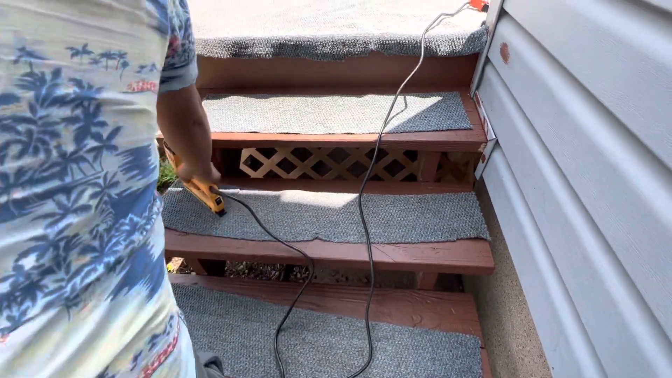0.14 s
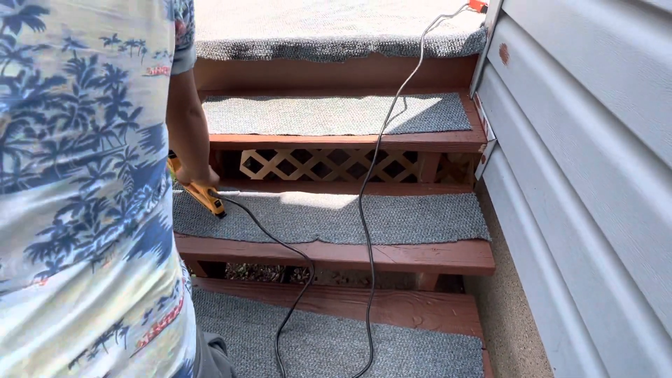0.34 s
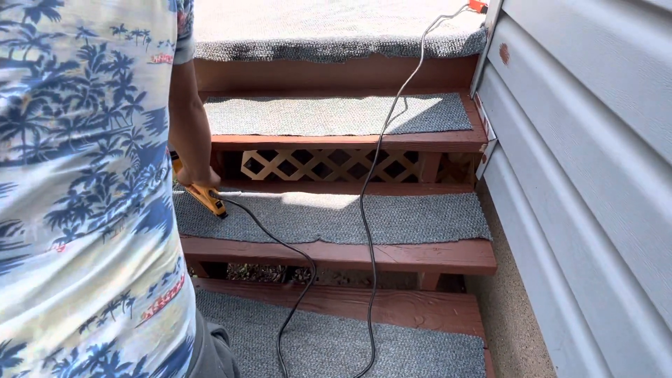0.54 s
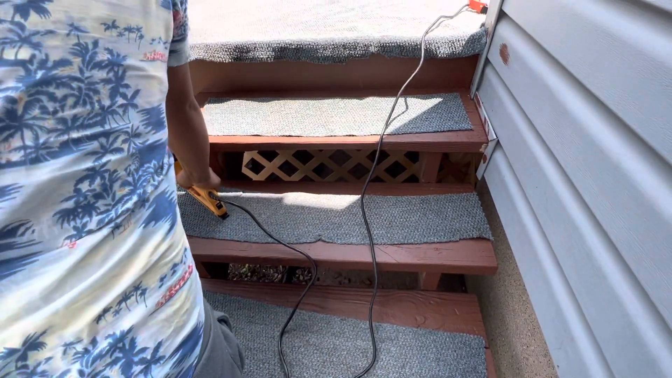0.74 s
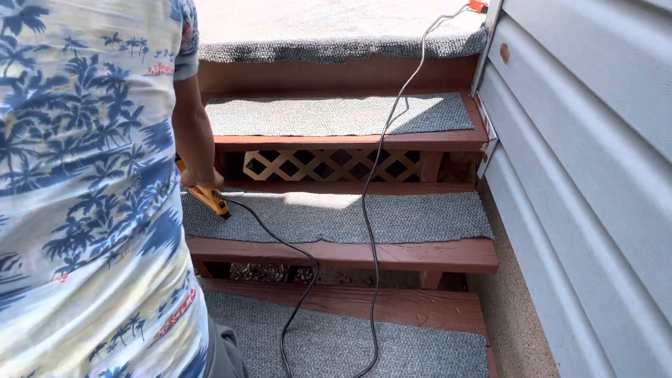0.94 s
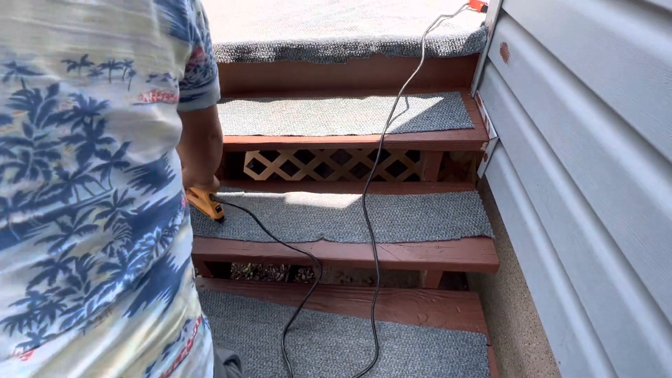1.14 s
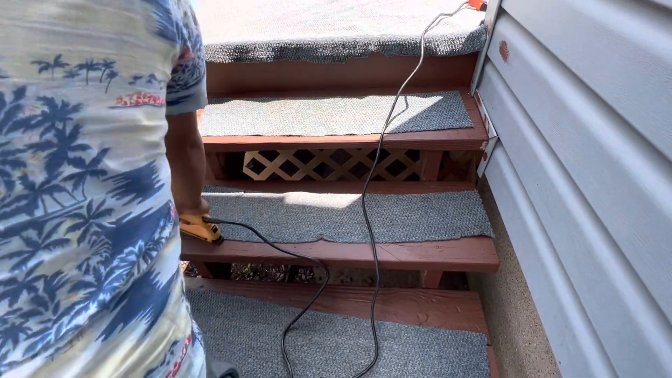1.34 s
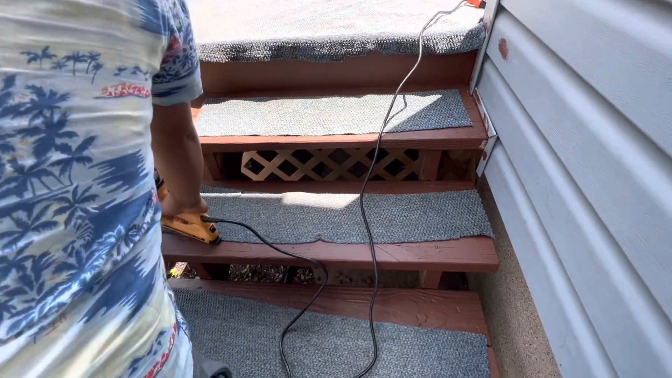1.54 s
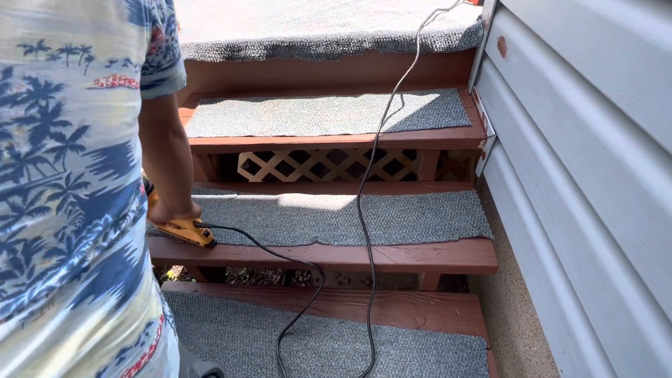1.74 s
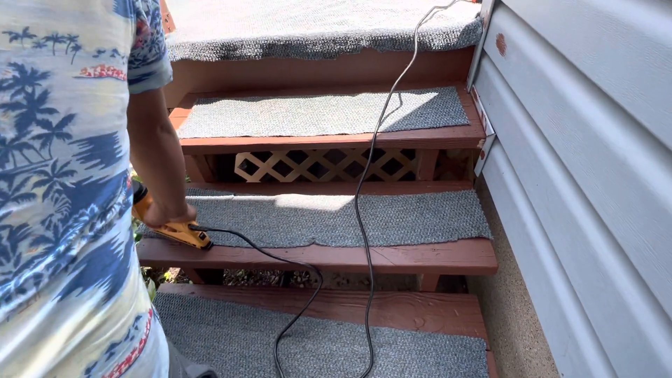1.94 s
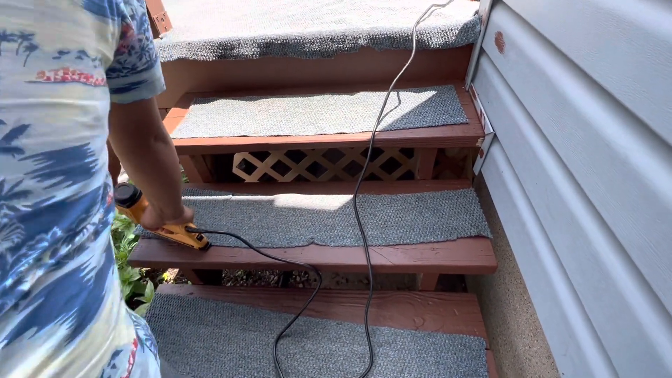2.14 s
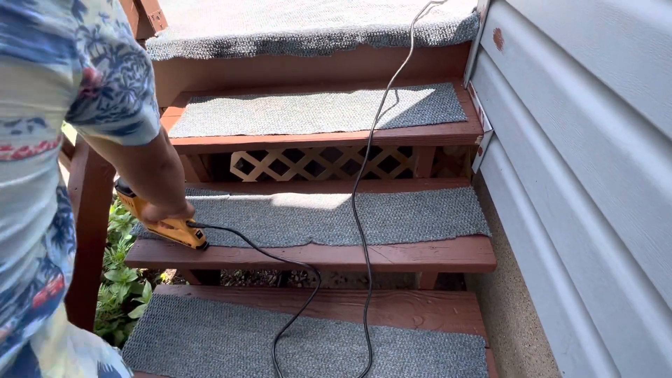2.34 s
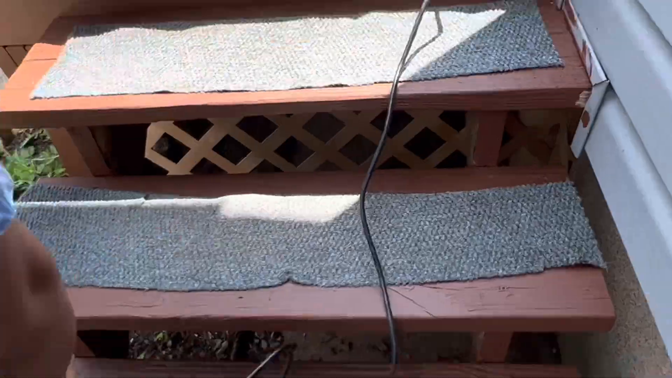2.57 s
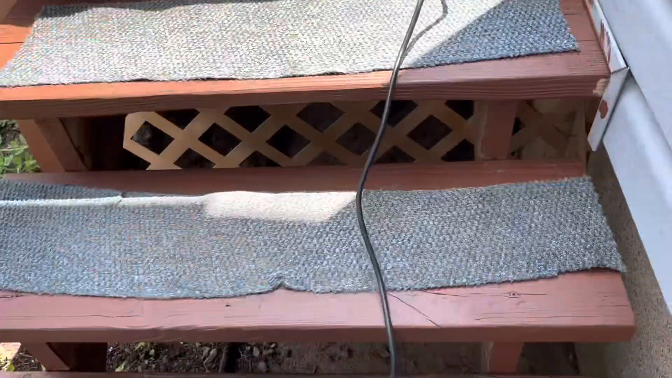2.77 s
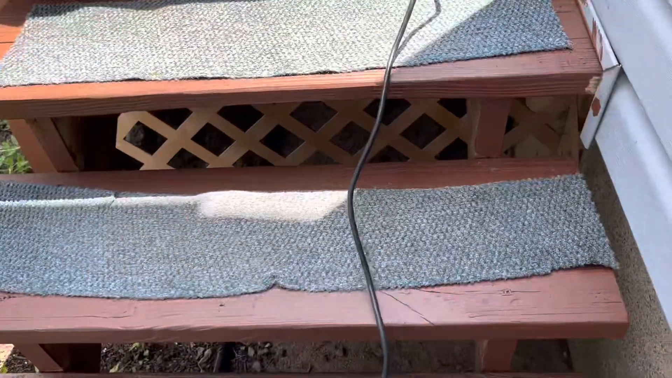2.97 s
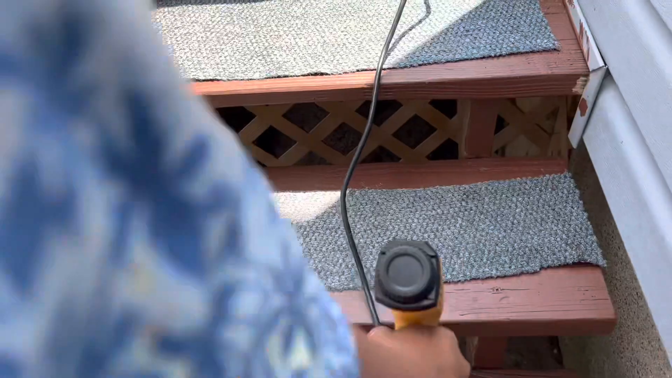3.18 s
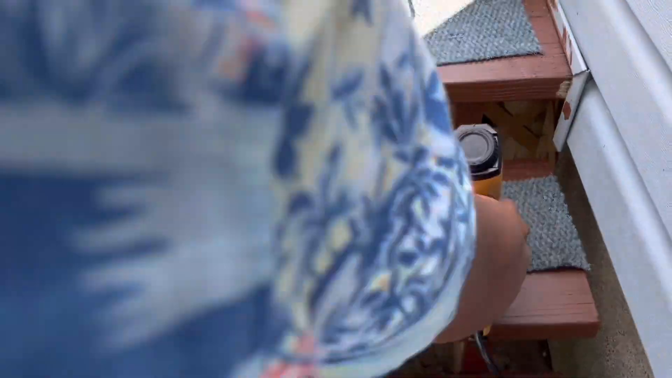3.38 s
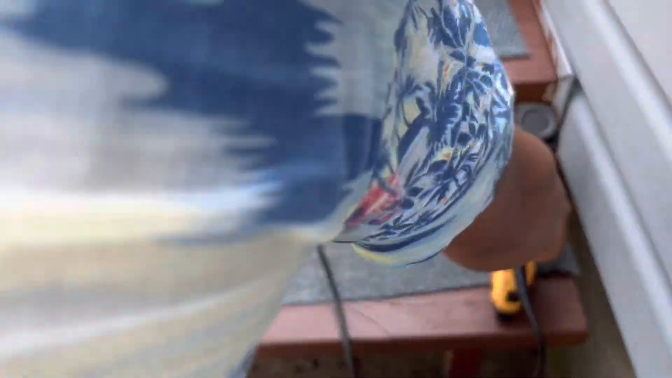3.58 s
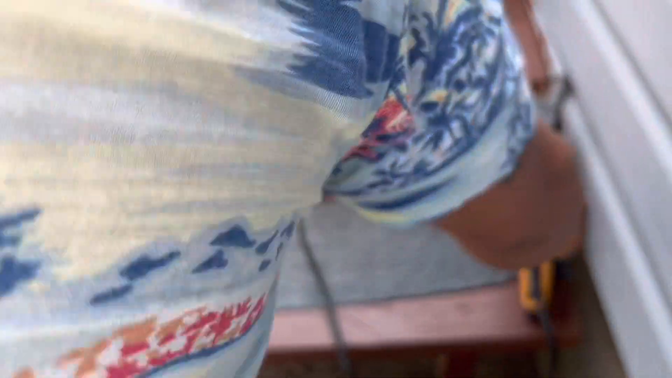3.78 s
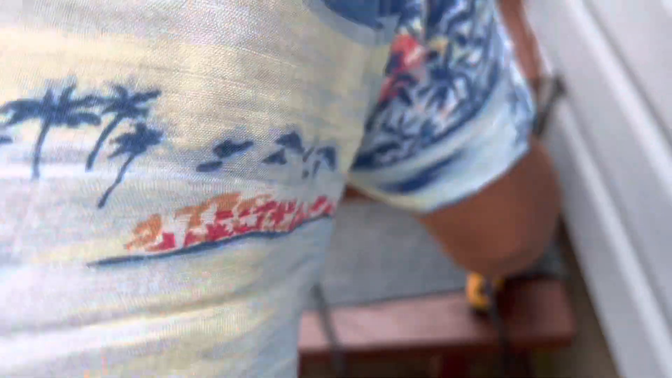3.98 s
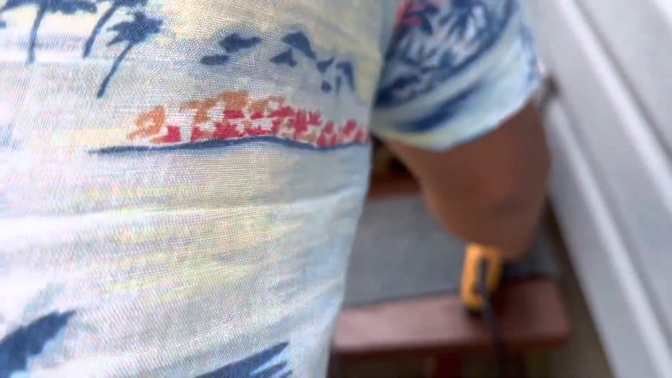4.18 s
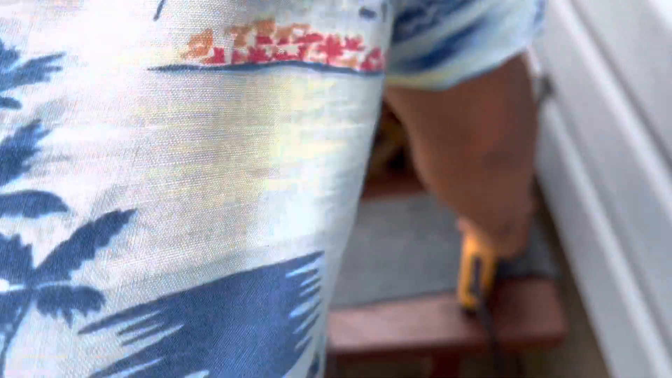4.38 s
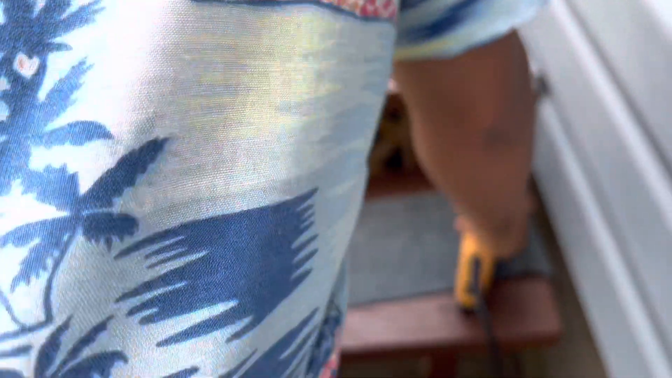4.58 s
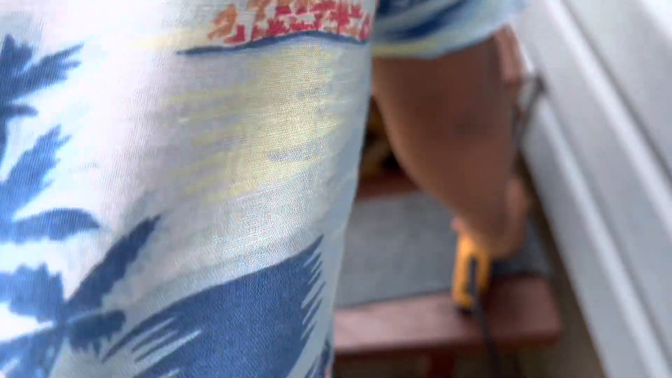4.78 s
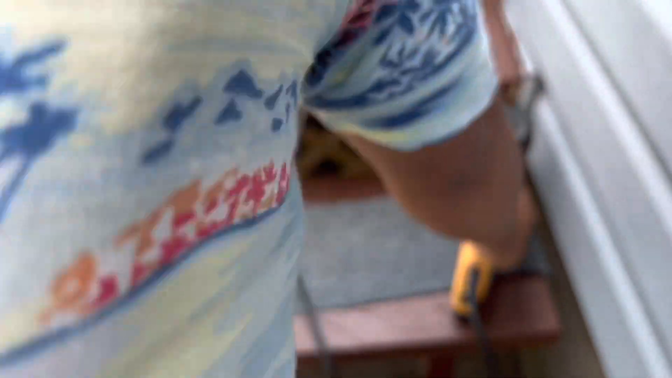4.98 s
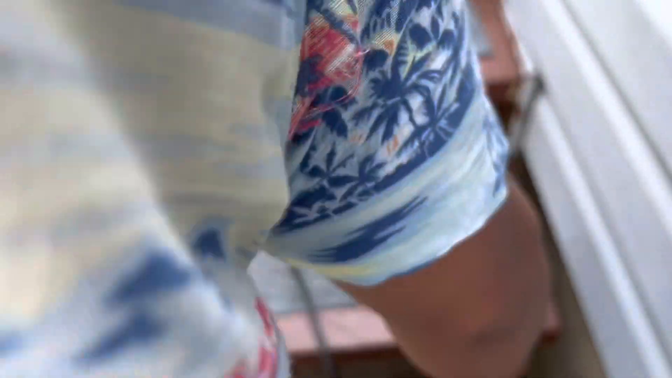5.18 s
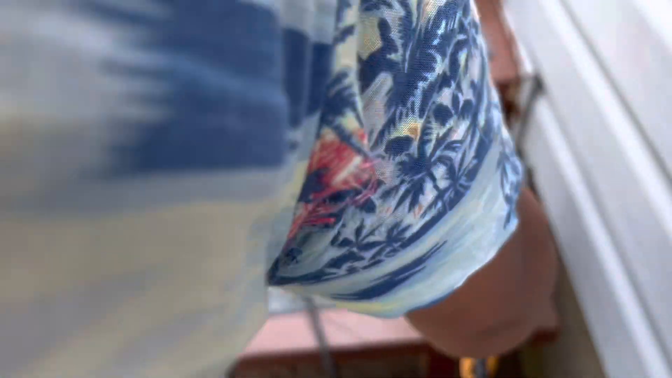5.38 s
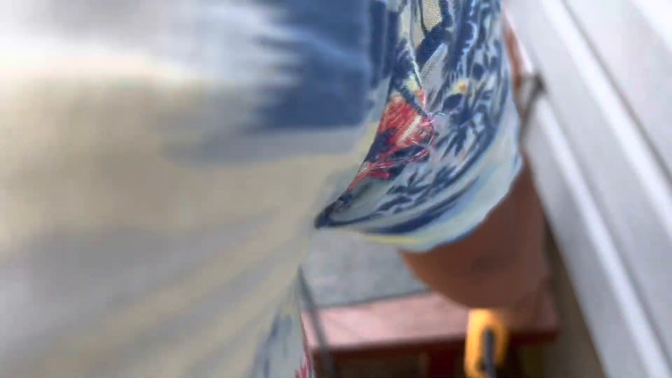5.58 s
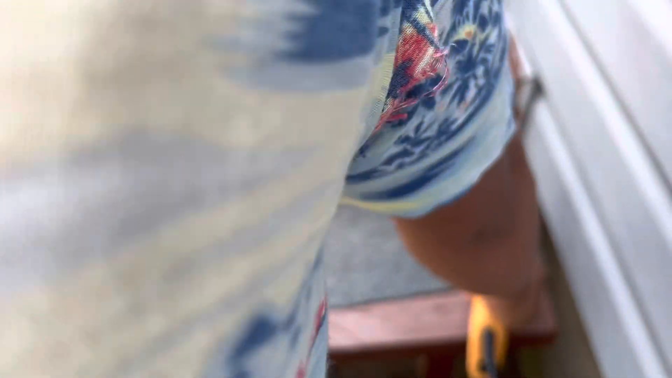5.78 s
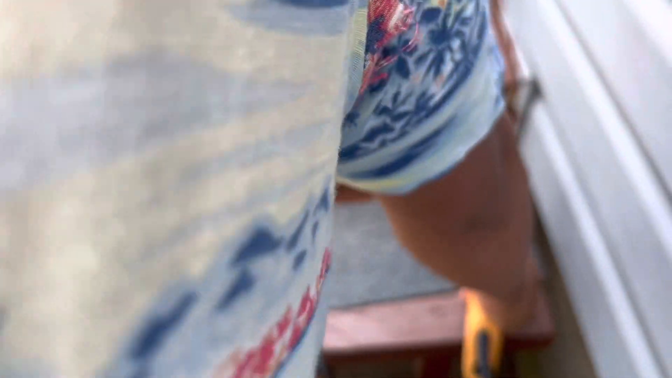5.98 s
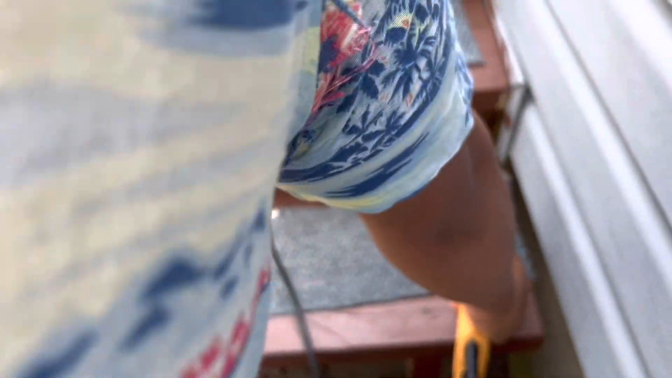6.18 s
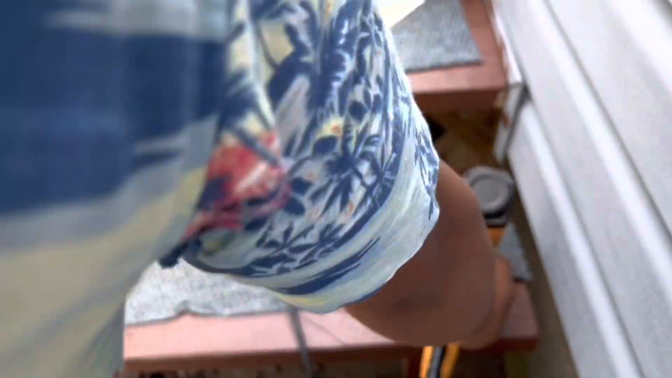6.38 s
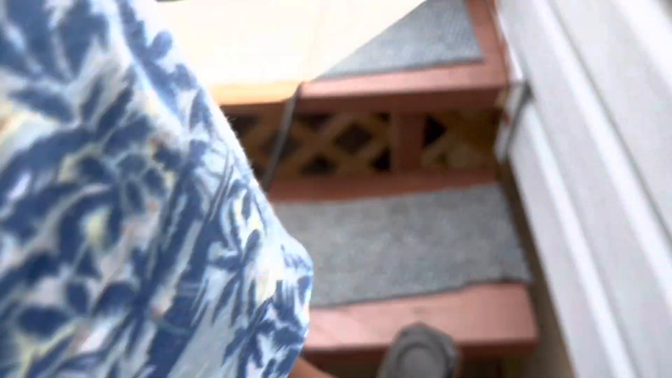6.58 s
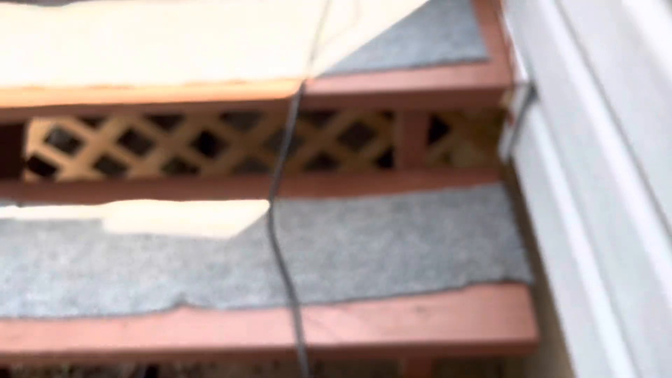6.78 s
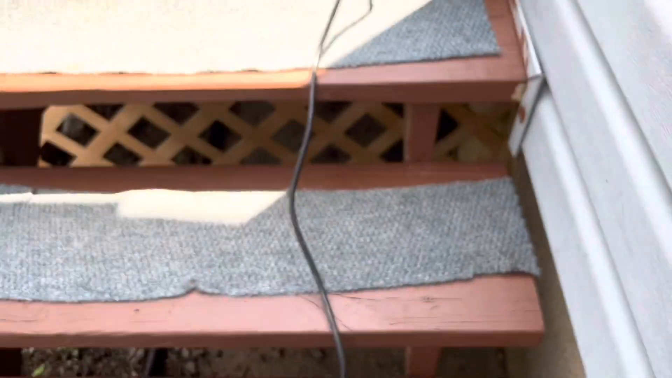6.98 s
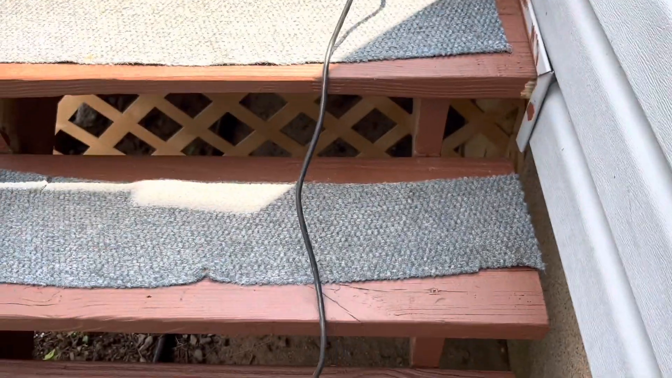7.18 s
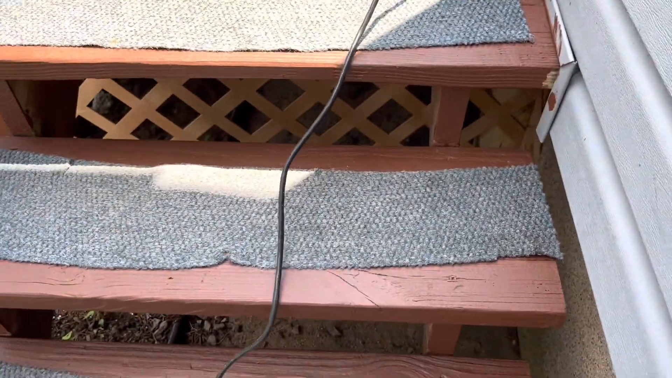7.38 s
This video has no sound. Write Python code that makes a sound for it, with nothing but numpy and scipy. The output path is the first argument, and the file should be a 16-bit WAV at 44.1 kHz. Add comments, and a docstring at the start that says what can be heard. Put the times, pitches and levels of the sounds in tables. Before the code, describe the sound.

A low, soft outdoor rumble with gentle air hiss runs throughout, quieter near the end. A faint handling tick at 0.5 s leads into the first stapler shot at 0.6 s: brief rattle, hard bright crack, hollow plastic clack, rebound about 15 ms later, small bounces and a short boom of the wooden step. Light rubbing and very thin high whistles follow, with clicks around 1.1 s. At 1.3 s the nose scuffs and thuds onto the carpeted tread; the second shot snaps at 1.95 s. Small clicks and soft swishes trail from 2.1 to 3 s. Handling scrapes and a sharp click come at 3.5-3.6 s, then a heavy hollow press at 4.0 s and the third shot at 4.5 s. Clicks cluster near 5 s, a softer press lands at 5.5 s, and the crisp fourth shot strikes at 6.1 s. Ticks and faint rubs fade out by 7.4 s.

```python
"""Outdoors, a low rumble and soft air hiss, both banded noise, run under an electric stapler on carpeted
wooden porch steps. A first handling tick leads to four shots at 0.6, 1.9, 4.5 and 6.1 s: a noise rattle runs up,
then touch, strike, rebound and bounces mix a noise crack, a sine clack and ringing modes, and a noise tail dies.
Noise rubs, faint swishes and thin sine whistles follow the first shot and return between and after the others.
From 1.3 s soft pumped-sine thuds join in; at 1.3, 4.0 and 5.5 s the nose scuffs, is pressed home and settles."""
import sys
import numpy as np
from scipy import signal
from scipy.io import wavfile

SR = 44100
rng = np.random.default_rng(int(sys.argv[2]) if len(sys.argv) > 2 else 0)


def materialize(psi):
    """Save the field psi as 16-bit PCM at rate SR to the path in sys.argv[1].

    A 1-D psi becomes a single channel; in a 2-D psi each row is a channel.
    """
    bounded = np.clip(np.atleast_2d(psi).T, -1, 1)
    quanta = np.round(bounded * 32767).astype(np.int16)
    wavfile.write(sys.argv[1], SR, quanta)


N = 327297


def from_db(db):
    """Decibels to amplitude."""
    return 10 ** (np.asarray(db) / 20)


def rms_one(x):
    """Scale to an rms of 1."""
    return x / np.sqrt(np.mean(x ** 2) + 1e-20)


def in_time(rows):
    """Draw each column as a line over the whole scene, silent outside its rows."""
    s, *columns = np.transpose(rows)
    return [np.interp(np.arange(N) / SR, s, c, left=-140, right=-140) for c in columns]


def at_hz(points, hz):
    """Read a curve at a frequency, straight over log frequency."""
    points = np.array(points)
    return np.interp(np.log(hz), np.log(points[:, 0]), points[:, 1])


def add(out, s, sound):
    """Mix a short sound in at a time."""
    i = round(s * SR)
    out[..., i:i + sound.shape[-1]] += sound[..., :N - i]


def panned(db):
    """Left and right gains that differ by this many dB, left louder when positive."""
    return from_db([[db / 2], [-db / 2]])


def swell(t, rise_s):
    """Rises to 1 at rise_s, then dies."""
    return t / rise_s * np.exp(1 - t / rise_s)


def drift(rate):
    """Slow chance with a spread of 1, faster for a higher rate in Hz."""
    step = 40   # samples between slow values
    r = np.exp(-2 * np.pi * rate * step / SR)
    white = rng.standard_normal(N // step + 2002)
    slow = signal.lfilter([1], [1, -2 * r, r * r], white)[2000:]
    return np.interp(np.arange(N) / step, np.arange(len(slow)), rms_one(slow))


EDGES_HZ = 24 * 2 ** np.arange(0, 9.6, .45)
# how alike left and right are, 1 same to -1 opposed: f/Hz, likeness
LIKENESS = [(60, 1), (150, 0.96), (300, 0.86), (640, 0.016), (1500, 0.59), (4000, -0.067), (8000, -0.32),
            (15000, .05)]


def noise_bands():
    """Stereo noise in bands of equal power per Hz, most alike in the bass: (centre Hz, 2 x N) pairs."""
    white, bands = rng.standard_normal((2, 2, N)), []
    for k, (low, high) in enumerate(zip(EDGES_HZ, EDGES_HZ[1:])):
        band_pass = signal.butter(2, [low, high], "band", fs=SR, output="sos")
        mid, side = signal.sosfilt(band_pass, white[k % 2])
        centre = np.sqrt(low * high)
        alike = np.clip(at_hz(LIKENESS, centre), -1, 1)
        bands.append((centre, np.sqrt(1 + alike) * mid + np.sqrt(1 - alike) * side * [[1], [-1]]))
    return bands


def coloured(bands, spectrum, patchy_db=0):
    """The bands inside a spectrum, weighted by it, each able to flicker on its own; rms 1."""
    total = 0
    for hz, band in bands:
        if spectrum[0][0] <= hz <= spectrum[-1][0]:
            flicker_db = patchy_db * drift(7.3) if patchy_db else 0
            total = total + from_db(at_hz(spectrum, hz) + flicker_db) * band
    return rms_one(total)


def rough(low, high):
    """Slightly grainy friction noise that also sets the shell humming, as two layers: body and treble."""
    grains = from_db(2.2 * drift(200))
    hum = 0
    for hz, db, t60 in SHELL:
        r = from_db(-60 / (t60 * SR))
        resonator = [1, -2 * r * np.cos(2 * np.pi * hz / SR), r * r]
        hum = hum + from_db(db) * signal.lfilter([1, 0, -1], resonator, low)
    return rms_one(grains * low + 0.091 * rms_one(hum)), grains * high


# outdoor bed, levels before layer trims: t/s, rumble level/dB, hiss level/dB, high hiss level/dB
AIR = [(0, -45.5, -55.5, -61), (.25, -48, -58, -77.5), (.6, -47, -57.5, -67.5), (1.2, -47.5, -57.5, -73.5),
       (1.85, -47.5, -60.5, -76.5), (2.3, -49, -61, -69.5), (2.6, -53, -60.5, -83.5),
       (3.2, -48.5, -61, -85.5), (3.6, -47, -55.5, -94.5), (4.2, -50.5, -62.5, -97.5),
       (4.9, -51, -61.5, -93), (5.3, -49.5, -63.5, -90.5), (6.0, -48, -60.5, -93.5),
       (6.4, -55.5, -67, -95.5), (6.8, -59.5, -67.5, -87), (7.42, -56.5, -66.5, -94.5)]
# low outdoor rumble: f/Hz, level per Hz/dB
RUMBLE = [(12, -37), (20, -13), (48, 5.5), (76, 1.5), (134, -4), (400, -30.5), (520, -51.5), (880, -120)]
# soft air hiss: f/Hz, level per Hz/dB
HISS = [(120, -29.5), (200, -6.5), (255, -11), (542, -11.5), (930, -15), (1790, -26), (3970, -25.5),
        (5350, -52.5), (6000, -32), (7800, -61.5), (13200, -120)]
# narrow high hiss: f/Hz, level per Hz/dB
HIGH_HISS = [(2940, -42.5), (5000, -11.5), (6140, 2.5), (8160, -0.5), (10100, -29.5), (12100, -15),
             (16500, -35)]
DIP_DB, DIP_RISE_S = -8.5, .07   # the rumble dips after each shot


def air(bands):
    """Rumble, hiss and a narrow high hiss, shaped from noise whose bands flicker separately."""
    rumble_db, hiss_db, high_db = in_time(AIR)
    since_shot = np.maximum(np.arange(N) / SR - np.array(SHOTS)[:, :1], 0)
    rumble_db = rumble_db + DIP_DB * swell(since_shot, DIP_RISE_S).sum(axis=0)
    rumble = from_db(rumble_db + 4) * coloured(bands, RUMBLE, patchy_db=4.0)
    hiss = from_db(hiss_db) * coloured(bands, HISS, patchy_db=3.5)
    narrow = signal.butter(5, [6300, 9300], "band", fs=SR, output="sos")
    high = coloured(bands, HIGH_HISS, patchy_db=1.5)
    high_hiss = from_db(high_db) * (signal.sosfilt(narrow, high) + 0.33 * high)
    return rumble + hiss + high_hiss


# trigger and handling ticks, levels before layer trims:
# t/s, level/dB, f/Hz, treble level/dB, left over right level/dB
TICKS = [(0.516, -58, 1090, -52, .1), (0.992, -58, 1040, -53, 0), (1.067, -47, 5550, -46, -15),
         (1.077, -33.5, 1540, -39.5, 8), (2.18, -39.5, 990, -61, 7), (2.205, -40, 2410, -46, 5),
         (2.254, -50.5, 1300, -72, 4), (2.31, -54, 4820, -51, 1.1), (2.337, -52, 1440, -69, 1.1),
         (2.36, -55.5, 2610, -57, -1), (3.487, -57, 4477, -38, .1), (3.6227, -28, 2120, -39, 1),
         (3.633, -35.5, 1010, -65, 11.5), (3.674, -45.5, 915, -73, 4), (3.781, -52, 2150, -66, 0),
         (4.093, -54, 1080, -53.5, 1), (4.438, -41, 2610, -47, 2), (4.758, -55.5, 1610, -60.5, -1.5),
         (4.783, -49, 2270, -78.5, 3), (4.903, -56, 4700, -55, -1.1), (4.933, -50, 2130, -70, 1.5),
         (4.968, -39, 2280, -68, 0.5), (4.982, -41, 2140, -58, 1), (4.989, -35.5, 2190, -66, 0),
         (6.035, -44, 1820, -51, 3), (6.281, -37.5, 1716, -50, 3.5), (6.36, -54, 2150, -54.5, -1.1),
         (6.369, -39, 2240, -65, 1), (7.083, -62, 883, -89, 1.5)]
TICK_T60_S, TICK_SHORTER_PER_DB = 0.048, 0.05   # decay at -45.5 dB; harder ticks are drier
TICK_RING_CYCLES = 83   # the ring loses a further 60 dB over these, so a high ring dies sooner


def ticks(body, treble):
    """A noisy snap with one short decaying sine ring."""
    out, t = np.zeros((2, N)), np.arange(int(.08 * SR)) / SR
    for s, db, hz, treble_db, pan_db in TICKS:
        i = round(s * SR)
        t60 = TICK_T60_S * np.exp(-TICK_SHORTER_PER_DB * (db + 45.5))
        fade = from_db(-60 * t / t60) * (1 - np.exp(-t / 0.00099))
        ring = 1.5 * np.sin(2 * np.pi * hz * t) * from_db(-60 * t * hz / TICK_RING_CYCLES)
        snap = from_db(db) * (ring + 0.76 * body[:, i:i + len(t)])
        bright = from_db(treble_db - 4.5) * treble[:, i:i + len(t)]
        add(out, s - .0005, fade * (snap + bright) * panned(pan_db))
    return out


RATTLE_START_DB, RATTLE_UNDER_CLACK_DB, RATTLE_T60_S, RATTLE_ONSET_S = -35, 4.5, .04, 0.0091
RATTLE_TREBLE_DB, RATTLE_TREBLE_FOLLOWS = -13.5, 0.48   # treble follows how far the crack stands over the clack
SCUFF_MS, SCUFF_TREBLE_DB, SCUFF_T60_S, SCUFF_ONSET_S = 15, -14.5, .07, 0.0012
SCUFF_CHANGE_DB = 2   # level gained along the scuff


def run_ups():
    """The plunger rattles up to each strike, the nose scuffs before each press.

    Rows: (start s, start dB, end dB, treble dB, ms, t60 s, onset s)."""
    rows = []
    for s, crack, clack, *_, ms, tail, yard in SHOTS:
        treble_db = RATTLE_TREBLE_DB + RATTLE_TREBLE_FOLLOWS * (crack - clack)
        rows.append((s - ms / 1000, RATTLE_START_DB, clack - RATTLE_UNDER_CLACK_DB, treble_db, ms,
                     RATTLE_T60_S, RATTLE_ONSET_S))
    for s, *_, ms, db, tail in PRESSES:
        rows.append((s - ms / 1000, db, db + SCUFF_CHANGE_DB, SCUFF_TREBLE_DB, SCUFF_MS,
                     SCUFF_T60_S, SCUFF_ONSET_S))
    return rows


def slides(body, treble):
    """Short friction noises whose level changes faster toward their end, then dies away."""
    out, t = np.zeros((2, N)), np.arange(int(.12 * SR)) / SR
    for start, start_db, end_db, treble_db, ms, t60, onset_s in run_ups():
        i, way = round(start * SR), t / (ms / 1000)
        level_db = start_db + (end_db - start_db) * np.minimum(way, 1) ** 2
        level_db = level_db - 60 * np.maximum(t - ms / 1000, 0) / t60
        friction = body[:, i:i + len(t)] + from_db(treble_db) * treble[:, i:i + len(t)]
        add(out, start, (1 - np.exp(-t / onset_s)) * from_db(level_db) * friction)
    return out


# shots, levels before trims: strike t/s, crack level/dB, clack level/dB, clack f/Hz, shell level/dB,
# step level/dB, step tilt/dB per octave, left over right level/dB, first touch ahead t/ms,
# first touch loss level/dB, rebound loss level/dB, bounce loss level/dB, pace/ratio (scales bounce delays),
# rattle t/ms, tail level/dB, late echoes level/dB against the tail
SHOTS = [(0.584, -5.5, -14.5, 1213, -13.5, -19.5, -1, 3, 2.13, 11, 7, 6.5, 1.025, 17.6, -29.5, -28.5),
         (1.9496, -7, -21, 1107, -24, -22.5, -4.5, -4, 2.6, 4.5, 15, 2, 1.03, 18, -30, -27),
         (4.5163, -6.5, -10.5, 1218, -12.5, -23, 1, 2, 1.5, 22, 5.5, 5, .94, 16, -33.5, -29.5),
         (6.083, -4.5, -7.5, 1190, -12.5, -19.5, 5, 0.55, 1.76, 21, 3.5, 3.5, 0.85, 22.2, -26.5, -39.5)]
# rebound and bounces after the strike: delay t/ms, then against the strike's own row: crack level/dB,
# clack level/dB, clack pitch/ratio, shell level/dB, step level/dB; last, crack rise t/ms
BOUNCES = [(14.29, -3.5, 2, 0.91, -0.5, 8.5, 1.9), (41.6, -30.5, -7, .9, -17, -4.5, 1.6),
           (62.8, -44, -16.5, .78, -41, -9, 1.9)]
# nose pressed home on the tread, levels before trims: t/s, crack level/dB, clack level/dB, clack f/Hz,
# shell level/dB, step level/dB, left over right level/dB, settles after t/ms, settle loss level/dB,
# scuff ahead t/ms, scuff level/dB, tail level/dB
PRESSES = [(1.332, -41, -18.5, 910, -35.5, -28, 7.5, 9.6, 9, 37.3, -34, -34.5),
           (3.9912, -23, -3.5, 1065, -19, -15, 2, 14, 18.5, 32, -26, -30),
           (5.5196, -41, -8.5, 995, -25, -24, -0.5, 16.3, 22.5, 31.8, -32.5, -37)]
STRIKE_RISE_MS, TOUCH_RISE_MS, PRESS_RISE_MS = 1.6, 2.5, 3.1   # crack swell
PRESS_TILT_DB, SETTLE_PITCH, SETTLE_STEP_DB = -5.5, 0.92, -30.5   # tilt per octave; pitch ratio


def contacts():
    """Each shot touches, strikes, rebounds and bounces; each press lands and settles.

    Rows: (s, crack dB, clack dB, clack Hz, shell dB, step dB, step tilt dB, left-right dB, crack rise ms)."""
    rows = []
    for (s, crack, clack, hz, shell, step, tilt, pan, ahead_ms, touch_loss,
         rebound_loss, bounce_loss, pace, *_) in SHOTS:
        rows.append((s - ahead_ms / 1000, crack - touch_loss, clack - touch_loss / 4, .9 * hz,
                     shell - touch_loss / 2, step - 25, tilt, pan, TOUCH_RISE_MS))
        rows.append((s, crack, clack, hz, shell, step - 5, tilt, pan, STRIKE_RISE_MS))
        losses = [rebound_loss, bounce_loss, bounce_loss]
        for (ms, crack_by, clack_by, ratio, shell_by, step_by, rise_ms), loss in zip(BOUNCES, losses):
            rows.append((s + pace * ms / 1000, crack + crack_by - loss, clack + clack_by - loss, hz * ratio,
                         shell + shell_by - loss, step + step_by - loss, tilt, pan / 2, rise_ms))
    for s, crack, clack, hz, shell, step, pan, after_ms, loss, *_ in PRESSES:
        rows.append((s, crack, clack, hz, shell, step, PRESS_TILT_DB, pan, PRESS_RISE_MS))
        rows.append((s + after_ms / 1000, crack - loss - 4, clack - loss, SETTLE_PITCH * hz, shell - 29,
                     SETTLE_STEP_DB, PRESS_TILT_DB, pan, PRESS_RISE_MS))
    return rows


def struck(modes, tilt_db, rise_s, t):
    """All modes ring at once, each with a chance strength, pitch and sign; a finite contact builds them up."""
    hz, db, t60 = np.transpose(modes)[:, :, None]
    strength, detune, sign = rng.standard_normal((3, len(modes), 1))
    tilted_db = db + tilt_db * np.log2(hz / np.median(hz))
    gains = np.sign(sign) * from_db(tilted_db + 2.5 * strength - 60 * t / t60)
    rings = gains * np.sin(2 * np.pi * hz * (1 + 0.021 * detune) * t)
    return (1 - np.exp(-t / rise_s)) * np.sum(rings, axis=0)


# plastic shell modes: nominal f/Hz, level/dB, t60/s
SHELL = [(1592, 0, 0.039), (2090, -4, 0.042), (2680, -0.5, .02), (2980, -5, 0.006), (3610, -2.5, 0.011),
         (4026, -5.5, 0.036), (4250, -7, 0.036), (5650, -9, .025), (7400, -13.5, 0.071), (8730, -12, 0.026)]
# wooden step modes: nominal f/Hz, level/dB, t60/s
STEP = [(105, -5, 0.11), (187.4, -6, 0.15), (214, -6, 0.12), (270, 0, 0.068), (389, -6.5, 0.058),
        (528.4, -0.5, 0.058)]
CLACK_SWELL_S, CLACK_LAG_S = 0.002, 0.001
HARDNESS = 0.09   # shell tilt in dB per octave for each dB that the crack stands over the shell


def blows(crack):
    """Each contact: a noise crack, a hollow sine clack, the plastic shell ringing, the wooden step booming."""
    out, t = np.zeros((2, N)), np.arange(int(.2 * SR)) / SR
    for s, crack_db, clack_db, clack_hz, shell_db, step_db, tilt_db, pan_db, rise_ms in contacts():
        i = round(s * SR)
        bright = from_db(crack_db - 8.0) * swell(t, rise_ms / 1000) ** 2 * crack[:, i:i + len(t)]
        clack = from_db(clack_db) * swell(t, CLACK_SWELL_S) ** 2 * np.sin(2 * np.pi * clack_hz * t)
        hard_db = min(HARDNESS * (crack_db - shell_db), 2)   # softer contacts favour the low modes
        two_angles = np.array([struck(SHELL, hard_db, 0.00051, t) for ear in range(2)])
        shell = from_db(shell_db - 2.0) * two_angles
        step = from_db(step_db - 1.5) * struck(STEP, tilt_db, 0.0018, t)
        add(out, s - .001, (bright + shell) * panned(pan_db) + step)
        cushioned = crack_db < clack_db - 10   # builds its clack later
        add(out, s + CLACK_LAG_S * cushioned - .001, clack * panned(pan_db))
    return out


SHOT_TAIL_LAG_S, SHOT_TAIL_TILT_DB, SHOT_TAIL_STRETCH = .011, 3.64, 1.15   # tilt per octave
PRESS_TAIL_LAG_S, PRESS_TAIL_TILT_DB, PRESS_TAIL_STRETCH, PRESS_YARD_DB = 0.0046, 1, 0.31, -29.5


def hangovers():
    """What hangs on after shots and presses: (s, level dB, tilt dB per octave, decay stretch, late echoes dB)."""
    shots = [(s + SHOT_TAIL_LAG_S, db, SHOT_TAIL_TILT_DB, SHOT_TAIL_STRETCH, yard_db)
             for s, *_, db, yard_db in SHOTS]
    presses = [(s + PRESS_TAIL_LAG_S, db, PRESS_TAIL_TILT_DB, PRESS_TAIL_STRETCH, PRESS_YARD_DB)
               for s, *_, db in PRESSES]
    return shots + presses


# tail decay before each event's stretch: f/Hz, t60/s
TAIL_T60 = [(200, 0.19), (600, 0.098), (1500, 0.12), (4000, 0.15), (8000, 0.067), (15000, 0.037)]
# tail colour before each event's tilt: f/Hz, level per Hz/dB
TAIL = [(120, -27), (200, 4), (382, 3), (522, -4), (628, -20), (1030, 1.5), (1900, -36.5), (2210, -15.5),
        (12700, -34), (16500, -55.5)]
YARD_T60_S, TAIL_GRAIN_DB = 0.81, 3.5


def tails(bands):
    """Rattle and nearby reflections die band by band as grainy noise, over the slower echoes of the yard."""
    out, t = np.zeros((2, N)), np.arange(int(.7 * SR)) / SR
    grain = from_db(TAIL_GRAIN_DB * drift(90))
    for s, db, tilt_db, stretch, yard_db in hangovers():
        i = round(s * SR)
        yard = from_db(yard_db - 60 * t / YARD_T60_S)
        for hz, band in bands[9:]:   # from about 400 Hz up
            nearby = from_db(-60 * t / (stretch * at_hz(TAIL_T60, hz))) * grain[i:i + len(t)]
            level_db = db + 20.5 + at_hz(TAIL, hz) + tilt_db * np.log2(hz / 1000)
            add(out, s, from_db(level_db) * (nearby + yard) * band[:, i:i + len(t)])
    return out


# rubbing strokes and faint breath-like swishes: start t/s, rise t/s, hold t/s, fall t/s,
# level/dB before shaping, treble level/dB against the body, ring f/Hz, ring level/dB against the body
RUBS = [(0.669, 0.11, 0.043, .12, -60, -5, 3120, -0.5), (2.084, 0.045, 0.089, 0.12, -57, -11, 1390, -30),
        (2.305, 0.089, .01, 0.15, -64.5, -26, 1400, -21), (2.722, .04, 0.26, 0.032, -66.5, -12, 2100, 4),
        (3.242, 0.082, 0.099, 0.037, -73.5, 5.5, 4300, -3),
        (3.457, .015, 0.021, 0.066, -40, -10.5, 1390, -19),
        (3.522, 0.048, 0.044, 0.038, -41.5, -6, 2280, -9), (3.627, .02, 0.026, 0.077, -60, -6.5, 2200, -1),
        (4.693, 0.052, 0.03, .04, -60.5, -16.5, 2220, -19),
        (4.923, 0.038, 0.036, 0.022, -55, -7.5, 2200, -7),
        (6.184, 0.075, 0.035, 0.031, -62, -7.5, 3800, -4), (6.499, 0.054, 0.092, 0.069, -78, -20, 3000, 2),
        (6.799, 0.086, 0.11, 0.13, -69.5, -7.5, 3700, 0),
        (7.254, 0.026, 0.0086, .05, -61.5, -11, 1500, -12.5)]
RUB_EDGE_DB, RUB_RING_Q = -14, 7   # where the dB ramps start and end, before lowering to silence


def rubs(body, treble):
    """Longer noise strokes and swishes that rise, hold and fall, each with a coloured ring."""
    out = np.zeros((2, N))
    for s, rise, hold, fall, db, treble_db, ring_hz, ring_db in RUBS:
        corners = np.cumsum([0, rise, hold, fall])
        t, i = np.arange(int(corners[-1] * SR)) / SR, round(s * SR)
        ramp_db = np.interp(t, corners, [RUB_EDGE_DB, 0, 0, RUB_EDGE_DB])
        shape = from_db(ramp_db) - from_db(RUB_EDGE_DB)
        low, high = body[:, i:i + len(t)], treble[:, i:i + len(t)]
        ring = rms_one(signal.lfilter(*signal.iirpeak(ring_hz, RUB_RING_Q, fs=SR), low))
        add(out, s, from_db(db) * shape * (low + from_db(ring_db) * ring + from_db(treble_db) * high))
    return out


# thin whistles: start t/s, end t/s, start f/Hz, end f/Hz, rms level/dB before swell and waver
WHISTLES = [(0.751, 1.06, 7930, 7880, -65.5), (.78, 1.1, 5910, 5760, -74.5),
            (1.64, 1.92, 5800, 5700, -78.5), (3.253, 3.4, 5800, 5930, -74), (3.28, 3.4, 7100, 7300, -76.5),
            (3.262, 3.443, 4130, 3800, -74), (3.33, 3.43, 14910, 15100, -80),
            (4.07, 4.22, 7780, 7650, -77.5), (4.1, 4.19, 8340, 8340, -83), (4.23, 4.51, 6350, 6300, -69),
            (4.28, 4.51, 7510, 7570, -74), (4.27, 4.5, 4995, 4995, -82), (6.208, 6.269, 1955, 1955, -61)]
WAVER_DB, WOBBLE = 3, .003   # level spread, pitch spread as a fraction


def whistles():
    """Slightly unsteady sines, held or gliding, that swell and fade."""
    out, waver, wobble = np.zeros((2, N)), drift(15), drift(8)
    for start, end, start_hz, end_hz, db in WHISTLES:
        i, j = round(start * SR), round(end * SR)
        hz = np.linspace(start_hz, end_hz, j - i) * (1 + WOBBLE * wobble[i:j])
        tone = np.sqrt(2) * np.sin(2 * np.pi * np.cumsum(hz) / SR)
        out[:, i:j] += from_db(db + WAVER_DB * waver[i:j]) * np.hanning(j - i) ** .5 * tone
    return out


# tool or foot landing softly on a tread: t/s, level/dB, f/Hz, swell t/ms,
# overtone level/dB and after-swing level/dB, both against the landing
THUDS = [(1.312, -13.5, 167.5, 6.2, -14.5, -16.5), (2.18, -36, 315, 5.1, -3.5, -30),
         (2.256, -49, 417, 7, -16, -30), (2.439, -36.5, 238, 3.6, -8.5, -9.5),
         (3.471, -17, 251, 3.6, -7.5, -14), (3.972, -6, 187, 7.7, -11, -16),
         (5.502, -19.5, 198, 8.7, -4.5, -19.5)]
OVERTONE, OVERTONE_SWELL_MS = 1.65, 5.3   # frequency ratio, swell
AFTER_SWING_SWELLS, AFTER_SWING_HZ, AFTER_SWING_MS = 3.9, 192.9, 16.3   # delay in landing swells, pitch, swell


def pump(t, db, hz, ms):
    """A sine under a bell-like swell that peaks after ms."""
    return from_db(db) * swell(t ** 2, (ms / 1000) ** 2) ** .5 * np.sin(2 * np.pi * hz * t)


def thuds():
    """A soft landing pumps the tread for a few cycles, with an overtone and a weaker after-swing."""
    out, t = np.zeros((2, N)), np.arange(int(.12 * SR)) / SR
    for s, db, hz, ms, over_db, after_db in THUDS:
        overtone = pump(t, db + over_db, OVERTONE * hz, OVERTONE_SWELL_MS)
        add(out, s, pump(t, db, hz, ms) + overtone)
        after_swing = pump(t, db + after_db, AFTER_SWING_HZ, AFTER_SWING_MS)
        add(out, s + AFTER_SWING_SWELLS * ms / 1000, after_swing)
    return out


# noise colour of the crack: f/Hz, level per Hz/dB
CRACK = [(1530, -27.5), (2600, -2), (3540, -12.5), (5210, -2.5), (5950, -3), (10100, -12), (15400, -14.5),
         (16500, -27)]
LEFT_LAG = 3   # samples


def scene():
    """Mix the outdoor air, the stapler, its tails and the whistles."""
    near = noise_bands()
    low = coloured(near, [(500, -3.5), (2200, -2.9), (5200, -9)])   # (Hz, dB per Hz)
    high = coloured(near, [(5000, 10.5), (9000, -0.5), (16500, -9.5)])
    body, treble = rough(low, high)
    left, right = air([(hz, band[:, ::-1]) for hz, band in near])   # the same noise, time-reversed
    outdoors = np.array([np.roll(left, LEFT_LAG), right])   # the air reaches the right side first
    tool = ticks(body, treble) + slides(body, treble) + blows(coloured(near, CRACK))
    tool = tool + rubs(body, treble) + thuds()
    return outdoors + tool + tails(near) + whistles()


def record(dry):
    """The microphone loses the deepest bass, peaks are rounded, the top is cut."""
    thin = signal.sosfilt(signal.butter(4, 38, "high", fs=SR, output="sos"), dry)
    rounded = 1.3 * np.tanh(thin / 1.3)
    top_cut = signal.cheby2(12, 70, 16200 * 1.04, fs=SR, output="sos")   # 70 dB down from this edge up
    return signal.sosfilt(top_cut, rounded)


dry = scene()
out = record(dry)
materialize(out)
```